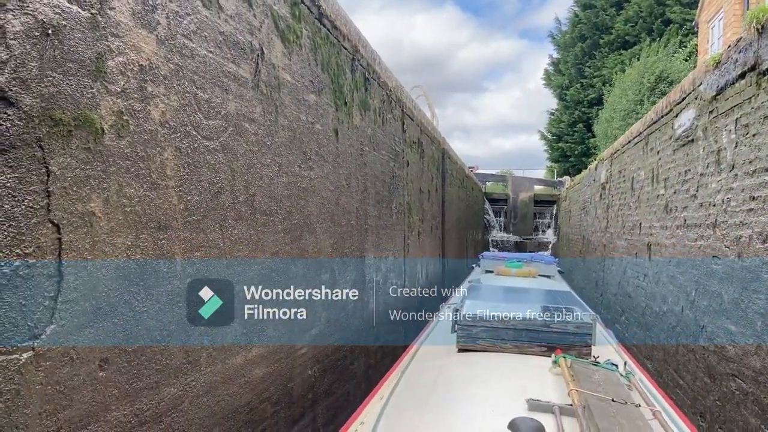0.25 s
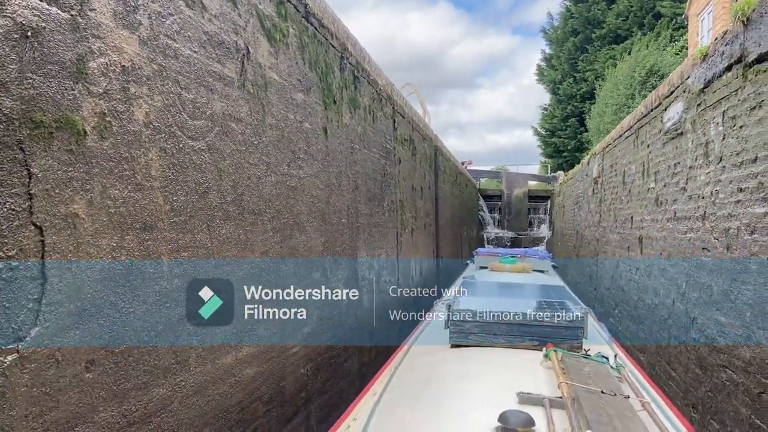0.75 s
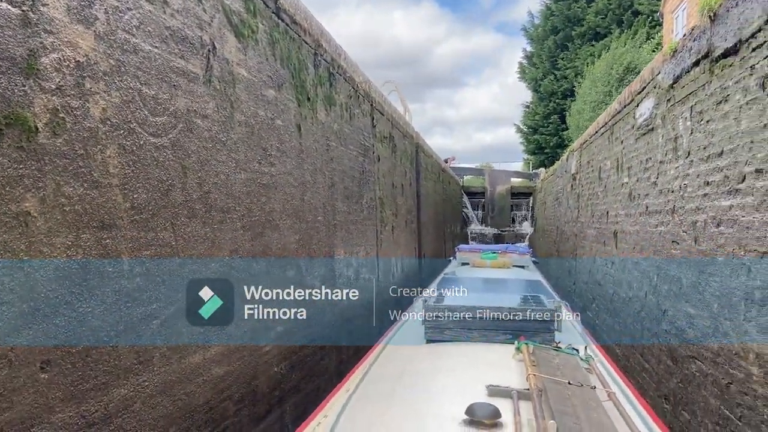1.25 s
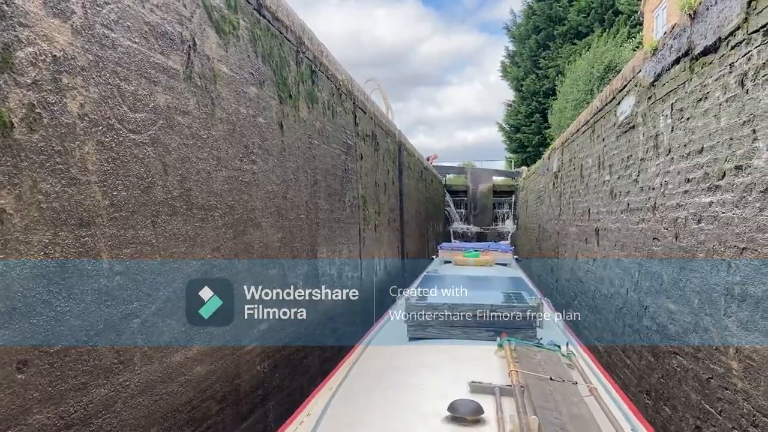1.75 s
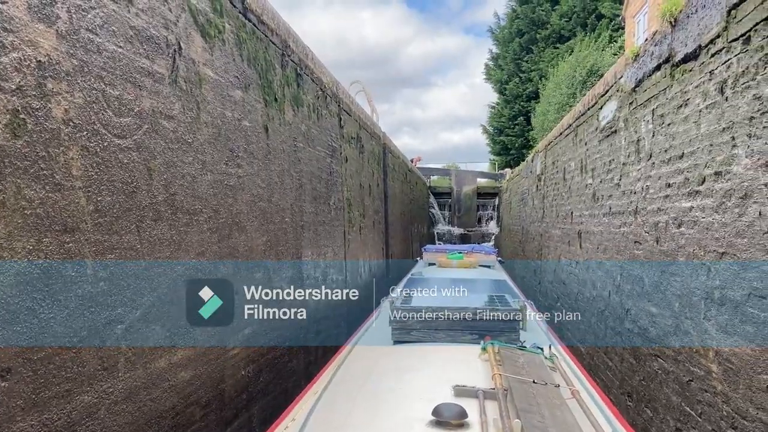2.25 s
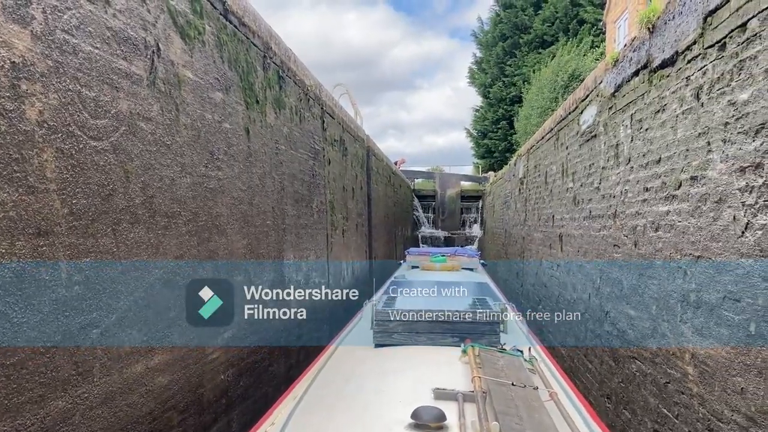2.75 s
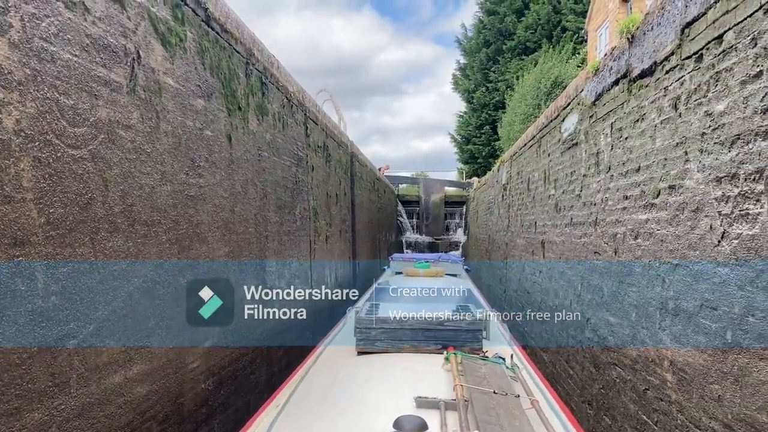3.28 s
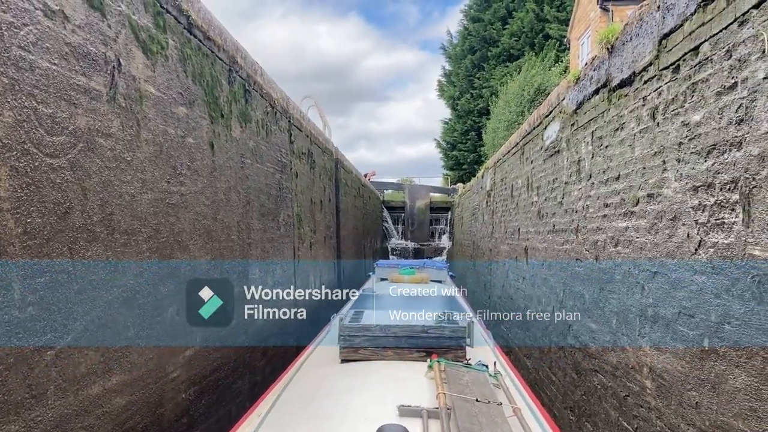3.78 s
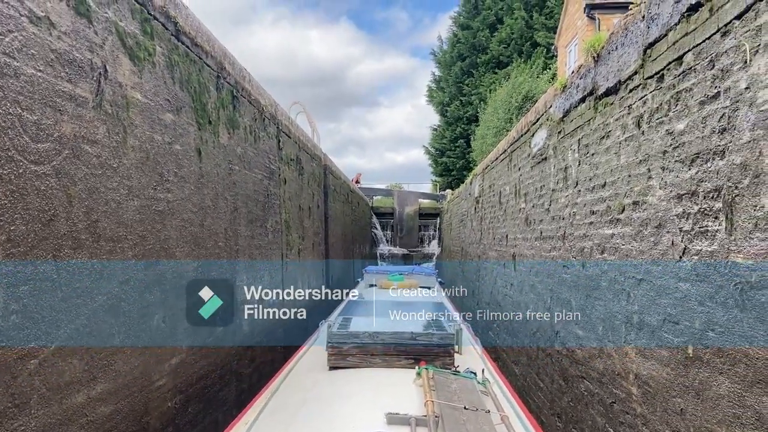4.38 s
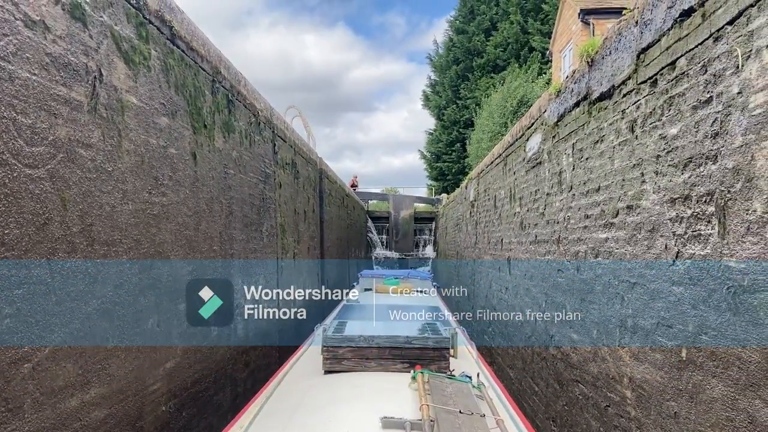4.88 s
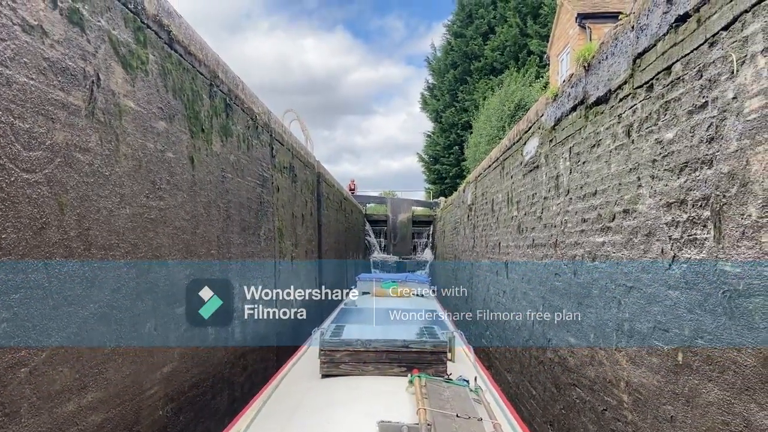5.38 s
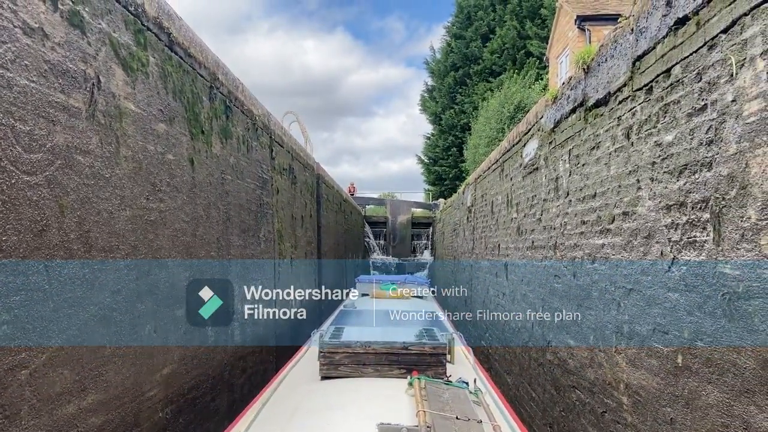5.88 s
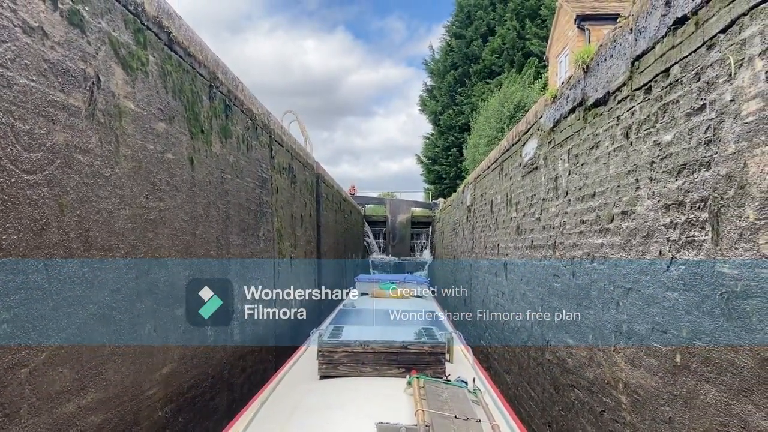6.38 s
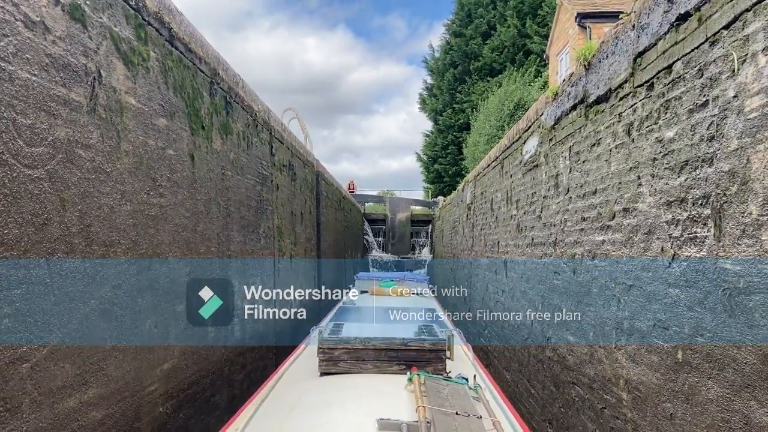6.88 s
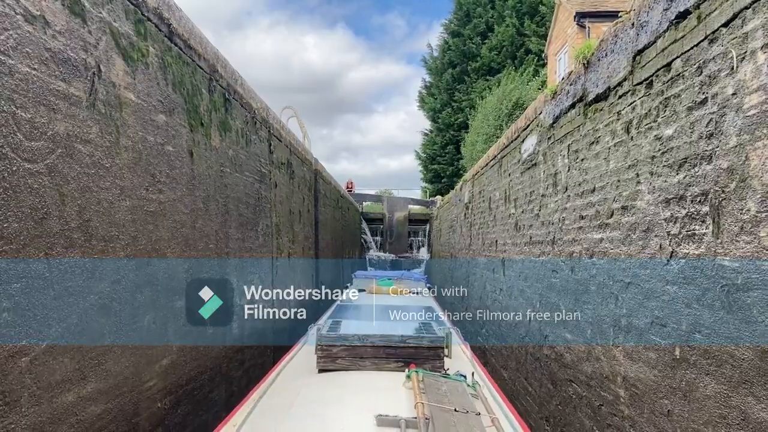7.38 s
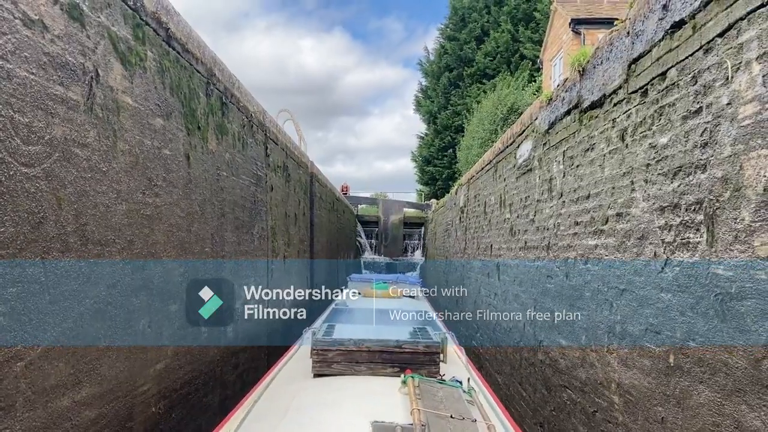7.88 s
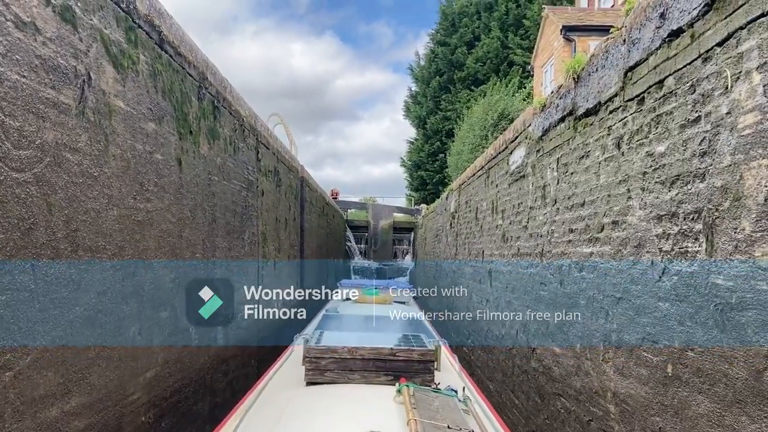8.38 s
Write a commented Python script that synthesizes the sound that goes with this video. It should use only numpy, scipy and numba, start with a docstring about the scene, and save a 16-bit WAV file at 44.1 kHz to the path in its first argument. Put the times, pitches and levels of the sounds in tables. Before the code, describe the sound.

A continuous cascade pours through lock gates ahead of a boat for about 8.7 seconds, broad and stereo, warm in the low mids with softer fizz above, gently surging, with bubbles, splashes and short reflections between stone walls. Underneath, a four-cylinder diesel idles at about 32 firings per second, slightly uneven, with a hull boom about eight times a second. Wind strikes the microphone: muffled thuds at 0.1 to 0.35, heavy ones near 1.1, more at 1.4, 1.95, 2.35 and 2.6, each hard blow ducking the whole sound for a fraction of a second. Softer buffets come near 3.1, 4.1, 4.6, 5.8 and 8.2 as the draught fades. A tiny bright water slap ticks at 3.26. Brief hollow gurgles surface around 0.9, 1.7, 3.6, 4.5, 5.8, 6.5 and 8 to 8.5. Water and engine continue to the end.

```python
"""Water pours through the gates of a deep canal lock, heard from the stern of a narrowboat: flickering
spray, ringing bubbles and clumps of drops, with an echo between the stone walls, gurgles and one slap.
The four-cylinder diesel idles underfoot: uneven firings drive the exhaust and make the hull boom.
Low turbulence buffets the microphone in a fading draught, short gusts and firm thuds; its gain
control ducks everything after a strong gust."""
import sys
import numpy as np
from scipy import signal
from scipy.fft import rfft, irfft
from scipy.io import wavfile
from scipy.ndimage import uniform_filter1d
from numba import njit

SR = 44100
rng = np.random.default_rng(int(sys.argv[2]) if len(sys.argv) > 2 else 0)


def dump_mix(stems):
    """Bounce the given channels to the path in sys.argv[1] as a 16-bit WAV at rate SR."""
    frames = np.atleast_2d(stems).T  # one column per channel
    limited = np.clip(frames, -1, 1)  # hard clip at full scale
    pcm = np.round(limited * 32767).astype(np.int16)
    wavfile.write(sys.argv[1], SR, pcm)


N = 381024


def undb(db):
    """Decibels to gain."""
    return 10 ** (np.asarray(db) / 20)


def level(x, db):
    """Scale to an rms level in dB."""
    return x * undb(db) / np.sqrt(np.mean(x ** 2))


def times():
    """Time of every sample in seconds."""
    return np.arange(N) / SR


def bins():
    """Frequency of every spectral bin in Hz, at least 1."""
    return np.maximum(np.arange(N // 2 + 1) * SR / N, 1)


def noise():
    """White noise of spread 1."""
    return rng.standard_normal(N)


def filtered(x, response):
    """Pass a sound through a frequency response."""
    return irfft(rfft(x) * response, N)


def over_hz(rows):
    """Each value column of (Hz, ..) rows, joined on a log-frequency axis."""
    hz, *columns = np.transpose(rows)
    return np.squeeze([np.interp(np.log(bins()), np.log(hz), column) for column in columns])


def causal(db):
    """Minimum-phase response with this gain: it rings after a blow, never before."""
    cepstrum = irfft(np.log(undb(db)), N)
    cepstrum[1:N // 2] *= 2
    cepstrum[N // 2 + 1:] = 0
    return np.exp(rfft(cepstrum))


def resonance(hz, width_hz):
    """Response of one resonance, gain 1 at its centre."""
    return 1 / (1 + 1j * (bins() ** 2 - hz ** 2) / (bins() * width_hz))


def pan(db):
    """Left and right gains for a left-minus-right level difference."""
    return undb(np.array([[1], [-1]]) * db / 2)


def walk(rate_hz):
    """Smooth random wander of spread 1 around zero."""
    slow = np.exp(-(bins() / rate_hz) ** 2)
    slow[0] = 0
    return level(filtered(noise(), slow), 0)


def clicks(at, size):
    """Impulses of the given sizes at the given times, wrapped round the end."""
    return np.bincount((at * SR).astype(int) % N, size, N)


def hump(at, length):
    """A smooth rise and fall around a moment, down to 1/e half a length away."""
    return np.exp(-(2 * (times() - at) / length) ** 2)


@njit
def ring(starts, hz, size, cycles, glide):
    """Each bubble is a fading sine whose pitch rises as it nears the surface."""
    out = np.zeros(N)
    for k in range(len(starts)):
        length = int(cycles[k] / hz[k] * SR)
        phase = 0.
        for i in range(min(length, N - starts[k])):
            age = i / length
            phase += 2 * np.pi * hz[k] * (1 + glide * age) / SR
            fade = np.exp(-5 * age) * min(age * 20, 1.)
            out[starts[k] + i] += size[k] * np.sin(phase) * fade
    return out


def bubbles(count=26000, low_hz=280, high_hz=5500, size_db=1.5, cycles=38, glide=0.089):
    """Air dragged under by the falling water rings at every pitch; a few bubbles stand out of the mass."""
    when, pitch, chance, life = rng.random((count, 4)).T
    hz = low_hz * (high_hz / low_hz) ** pitch
    size = hz * undb(-size_db * np.log(np.maximum(chance, 1 / 100)))
    starts = (when * N).astype(np.int64)
    sound = ring(starts, hz, size, cycles * (.5 + life), float(glide))
    # match the spectral density of the white-noise spray
    return level(sound, 0) * np.sqrt(2 * high_hz / SR)


def clumps(count=420, centre_hz=1800, width_hz=1700, size_db=2.0, decay_s=.012):
    """Sheets of water land one on another; each is a short splash that starts at once and dies away."""
    when, chance = rng.random((count, 2)).T
    size = undb(-size_db * np.log(np.maximum(chance, 1 / 50)))
    hits = clicks(when * N / SR, size ** 2)
    # the decay time is that of the power
    power = signal.lfilter([1], [1, -np.exp(-1 / (decay_s * SR))], hits)
    sound = filtered(noise() * np.sqrt(power), resonance(centre_hz, width_hz) ** 2)
    return level(sound, 0) * np.sqrt(2 * width_hz / SR)


def splash(flicker_db=0.78, flicker_hz=16, count=14, bubble_db=-2.5, clump_db=-6):
    """Churning foam: spray whose bands (drop sizes) flicker each on their own, with bubbles and clumps."""
    centres = np.geomspace(150, 15000, count)
    spray = 0
    for share in np.eye(count):
        band = np.sqrt(np.interp(np.log(bins()), np.log(centres), share))
        spray = spray + filtered(noise(), band) * undb(flicker_db * walk(flicker_hz))
    return spray + undb(bubble_db) * bubbles() + undb(clump_db) * clumps()


def flow():
    """How hard the cascade pours, in slow surges, as a level in dB over time."""
    # Each row: time in seconds, level in dB.
    surges = [(0.1, -0.4), (.45, -1.4), (1.0, -.9), (1.35, -.1), (1.9, 0.46), (2.4, -0.2), (3.0, 0.25),
              (3.55, .5), (4.0, 0.2), (4.4, 1.1), (4.6, -0.4), (5.15, 0.75), (5.65, 0.4), (5.9, -0.6),
              (6.3, 0.16), (7.3, 0.76), (7.9, 0.5), (8.2, -0.1), (8.6, .5)]
    return np.interp(times(), *np.transpose(surges))


def water(bounce=0.17, flutter_hz=2800, surge_db=0.3, surge_hz=12, lag_s=0.00024, lag_from_hz=6950):
    """The cascade at the gates ahead, echoing between the walls of the stone chamber."""
    # Colour of the falling water. Each row: frequency in Hz, relative level in dB per Hz.
    fall_colour = [(120, -6), (200, -4.5), (270, -4), (320, -1.5), (400, -3), (510, -3.3), (620, -7),
                   (780, -4.7), (950, -6.8), (1290, -9.6), (1600, -10), (2300, -12.4), (3200, -15.6),
                   (4800, -17), (6000, -19), (7200, -18.5), (11500, -21.3), (15000, -32.5)]
    # How alike the two microphone ports hear it. Each row: frequency in Hz, likeness from 0 to 1
    # (held to .97 at most below), left minus right in dB.
    port_rows = [(120, 0.8, 14), (300, 0.58, -1), (500, 0.35, -3.5), (720, 0.05, 1.5), (1050, 0.29, -1.5),
                 (1790, 0.14, -0.5), (2530, 0.37, 2.5), (4600, 0.47, 1.5), (5500, 0.04, 3), (6500, 1, 1),
                 (7400, 1, 0.5), (10200, 1, -0.3)]
    # The hollow under the gates, as resonances added to the direct sound.
    # Each row: frequency in Hz, width in Hz, level against the direct sound in dB.
    hollow_rows = [(1140, 45, -3.5), (2330, 150, -20)]
    water_db = -20.5  # ahead of the surges
    crossing_s = .01031  # sound travels from one chamber wall to the other

    likeness, pan_db = over_hz(port_rows)
    likeness = np.clip(likeness, 0, .97)
    mid = rfft(splash()) * np.sqrt(1 + likeness)
    side = rfft(splash()) * np.sqrt(1 - likeness)
    hollow = 1 + sum(undb(db) * resonance(hz, width) for hz, width, db in hollow_rows)
    # sound bounces from wall to wall, duller each time
    echo = bounce * np.exp(-2j * np.pi * bins() * crossing_s) / (1 + (bins() / flutter_hz) ** 4)
    low_cut = 1 / np.sqrt(1 + (45 / bins()) ** 6)
    colour = undb(over_hz(fall_colour)) * low_cut / (1 - echo)
    ports = np.array([mid * hollow + side, mid * hollow - side]) * pan(pan_db) * colour
    # above about 7 kHz the left channel lags the right by a fraction of a millisecond
    ports[0] *= np.exp(-2j * np.pi * np.maximum(bins() - lag_from_hz, 0) * lag_s)
    surge = undb(flow() + surge_db * walk(surge_hz))
    return level(irfft(ports, N), water_db) * surge


def gurgles(count=14, spread_octaves=0.13, cycles=26, glide=.12, pan_db=5):
    """Each gulp of trapped air is a cluster of big bubbles of nearly one pitch, scattered left to right."""
    # Each row: time in seconds, level in dB, length in seconds, middle pitch in Hz.
    gulp_rows = [(0.933, -31, .07, 505), (1.672, -29.5, .2, 460), (3.57, -27, 0.078, 403),
                 (4.421, -29, .06, 416), (4.56, -29, 0.057, 440), (5.798, -27.5, .08, 420),
                 (6.521, -26, .09, 385), (8.001, -31, 0.084, 430), (8.289, -30, 0.09, 495),
                 (8.5, -31, 0.063, 450)]
    out = np.zeros((2, N))
    for at, db, length, hz in gulp_rows:
        when, pitch, place = rng.uniform(-1, 1, (3, count))
        starts = (np.maximum(at + length * (when - .5) / 2, 0) * SR).astype(np.int64)
        pitches = hz * 2 ** (spread_octaves * pitch)
        lives = np.full(count, float(cycles))
        gulp = np.array([ring(starts, pitches, size, lives, float(glide)) for size in pan(pan_db * place)])
        # the level is the rms that the energy would have if spread over the length
        out += gulp * undb(db) * np.sqrt(2 * length * SR / np.sum(gulp ** 2))
    return out


def slap(at_s=3.2605, hz=5100, width_hz=1500, decay_s=.002, peak_db=-15.5):
    """A sheet of water smacks the stone: a tiny bright tick of fading noise through a doubled resonance."""
    age = times() - at_s
    burst = noise() * (age > 0) * np.exp(-np.abs(age) / decay_s)
    tick = filtered(burst, resonance(hz, width_hz) ** 2)
    return undb(peak_db) * tick / np.abs(tick).max()


def engine(first_s=.093, jitter_s=.00008, scatter_db=0.73, boom_pan_db=-5.0, boom_late_s=.092):
    """Firings drive the exhaust; once per four-stroke cycle the shaking engine makes the hull boom."""
    # Exhaust and hull, driven by every firing. Each row: frequency in Hz, relative gain in dB.
    exhaust_rows = [(20, -30.5), (32, -2), (64, 2.03), (97, -15), (129, -4), (161, -8), (193, -11),
                    (225, -18.5), (257, -15.5), (290, -27.5), (500, -36), (900, -48), (2500, -64),
                    (20000, -130)]
    # Place of the exhaust between the ports. Each row: frequency in Hz, left minus right in dB.
    exhaust_pan = [(32, -2.5), (64, -4), (97, 7), (129, 1.5), (161, -.5), (193, -4), (225, -9), (257, -4.5),
                   (500, 2)]
    # Relative strength of each cylinder in dB, in firing order.
    strengths_db = [0.98, -0.44, -0.06, -1.6]
    # What the hull rings with; each resonance acts twice, which narrows it.
    # Each row: frequency in Hz, width of a single pass in Hz, relative level in dB.
    hull_rows = [(66, 29, 0), (152, 30, -15), (203, 22, -11), (237, 22, -16)]
    firing_hz = 32.15
    hunt_s, hunt_hz = .00012, 1.2  # spread of the early or late firings, how fast that changes
    exhaust_db, boom_db = -12.5, -17.8

    firing = np.arange(int(N / SR * firing_hz))
    cylinder = firing % len(strengths_db)
    chance = rng.standard_normal((len(firing), 2))
    at = first_s + firing / firing_hz + jitter_s * chance[:, 0]
    # the idle speed hunts a little, which loosens the upper harmonics
    at = at + hunt_s * np.interp(at, times(), walk(hunt_hz))
    size = undb(np.array(strengths_db)[cylinder] + scatter_db * chance[:, 1])
    # each firing is a negative click
    exhaust = filtered(-clicks(at, size), causal(over_hz(exhaust_rows)) * pan(over_hz(exhaust_pan)))
    shake = clicks(at + boom_late_s, size * (cylinder == 0))
    hull = sum(undb(db) * resonance(hz, width) ** 2 for hz, width, db in hull_rows)
    boom = filtered(shake, hull * pan(boom_pan_db))
    return level(exhaust, exhaust_db) + level(boom, boom_db)


def eddies(colour, even_s):
    """Low turbulence of a given colour whose strength stays even from one eddy to the next."""
    x = filtered(noise(), undb(over_hz(colour)))
    envelope = np.abs(signal.hilbert(x))
    return x / np.sqrt(uniform_filter1d(envelope ** 2, int(even_s * SR)) / 2)


def wind(side_db=-14):
    """A fading, puffy draught with short gusts presses on both ports, mostly alike; gusts shed finer eddies."""
    # Gusts on the microphone. Each row: middle in seconds, level in dB, length in seconds,
    # level of the fine eddies against the gust in dB.
    gust_rows = [(.11, -16, .06, -13), (.29, -14, .1, -10), (1.078, -6.5, .03, -15), (1.135, -5, .04, -22),
                 (1.335, -6.5, .05, -24), (1.43, -6.3, .05, -22), (1.895, -8, .045, -24),
                 (1.972, -4.5, .036, -14), (2.355, -6, .09, -15), (2.55, -10, .08, -13),
                 (2.46, -11, .07, -14), (2.68, -3, .042, -28), (3.14, -11, .04, -22), (3.96, -13, .06, -24),
                 (4.078, -6, .055, -12), (4.38, -13, .14, -22), (4.61, -8.5, .04, -26),
                 (4.72, -12, .06, -26), (5.755, -8, .03, -16), (5.82, -10, .03, -24),
                 (8.165, -8.5, .04, -24)]
    # Colour of the buffeting. Each row: frequency in Hz, relative level in dB per Hz.
    buffet_colour = [(18, -36), (30, -8), (42, 0), (58, 0), (78, -2.5), (100, -9), (170, -19), (260, -30),
                     (500, -48), (1500, -80), (20000, -170)]
    # Colour of the finer eddies, which thud. Each row: frequency in Hz, relative level in dB per Hz.
    fine_colour = [(40, -30), (80, -2), (110, 0), (180, -1), (260, -7), (340, -18), (550, -33), (1500, -65),
                   (20000, -160)]
    draught_db, fall_db_per_s = -21, 0.55  # level at the start, steady fall
    puff_db, puff_hz = 3.5, 1.9  # spread and rate of small puffs in the draught
    stir_db, stir_s = -15.5, 0.66  # longer, weaker stir of air under each gust: level against it, length

    power = undb(draught_db - fall_db_per_s * times() + puff_db * walk(puff_hz)) ** 2
    fine_power = 0
    for at, db, length, fine_db in gust_rows:
        gust = undb(db) ** 2 * hump(at, length)
        stir = undb(db + stir_db) ** 2 * hump(at, stir_s)
        power = power + gust + stir
        fine_power = fine_power + gust * undb(fine_db) ** 2
    mid = eddies(buffet_colour, even_s=.025)
    side = eddies(buffet_colour, even_s=.025) * undb(side_db) * np.array([[1], [-1]])
    fine = eddies(fine_colour, even_s=.025)
    return np.sqrt(power) * (mid + side) + np.sqrt(fine_power) * fine


def thuds(cycles=1.4):
    """Single eddies strike the microphone: each is one quick push and pull of air on both ports."""
    # Each row: middle in seconds, highest level of the swell in dB, pitch in Hz.
    thud_rows = [(.098, -7, 210), (.211, -9, 200), (.293, -7, 140), (.347, -5, 115), (1.053, -1, 195),
                 (1.119, -1.5, 175), (1.408, -10, 200), (1.944, -5, 150), (1.960, -1, 190),
                 (2.333, -4, 125), (2.374, -9, 230), (2.557, -7, 210), (2.673, -9, 170)]
    out = 0
    for at, db, hz in thud_rows:
        swell = undb(db) * hump(at, cycles / hz)
        out = out + swell * np.cos(2 * np.pi * (hz * (times() - at) + rng.random()))
    return out


def scene():
    """Water ahead, engine below, wind on the microphone."""
    return water() + gurgles() + slap() + engine() + wind() + thuds()


@njit
def hold_peaks(x, ceiling, fall):
    """Follows every peak over the ceiling at once and sinks back slowly."""
    out = np.empty(len(x))
    held = ceiling
    for i in range(len(x)):
        held = max(x[i], ceiling + (held - ceiling) * fall)
        out[i] = held
    return out


def duck(envelope, ceiling, release_s):
    """Gain that holds an envelope under a ceiling and recovers slowly."""
    return ceiling / hold_peaks(envelope, float(ceiling), np.exp(-1 / (release_s * SR)))


def record(dry, threshold_db=-9, charge_s=.09, release_s=0.25, top_hz=15600):
    """Gain control ducks everything after a gust, the hardest thuds are rounded at full scale, the top is cut."""
    keep = np.exp(-1 / (charge_s * SR))
    # the detector needs a moment to charge, so the front of each gust thumps through
    loudness = np.sqrt(signal.lfilter([1 - keep], [1, -keep], np.mean(dry ** 2, axis=0)))
    steady = dry * duck(loudness, undb(threshold_db), release_s)
    rounded = steady / (1 + steady ** 12) ** (1 / 12)
    top_cut = signal.ellip(10, .1, 80, top_hz, fs=SR, output="sos")
    return signal.sosfilt(top_cut, rounded)


dry = scene()
out = record(dry)
dump_mix(out)
```